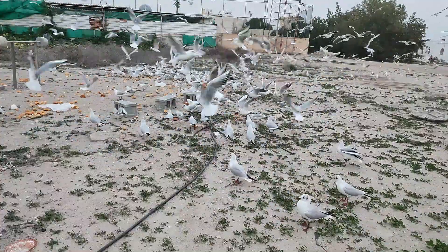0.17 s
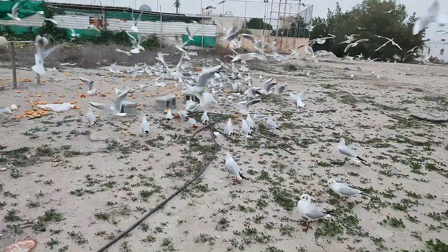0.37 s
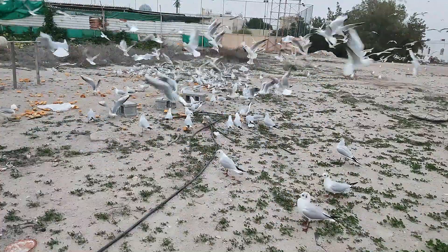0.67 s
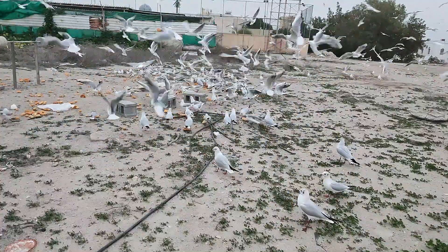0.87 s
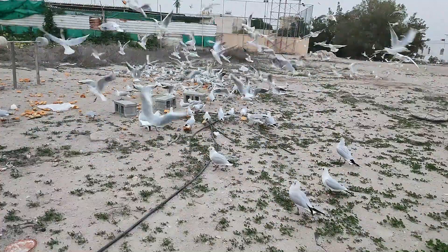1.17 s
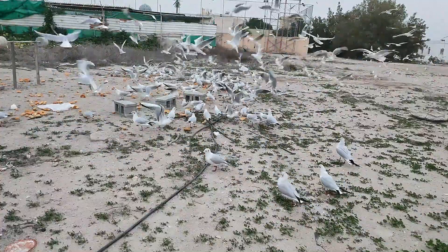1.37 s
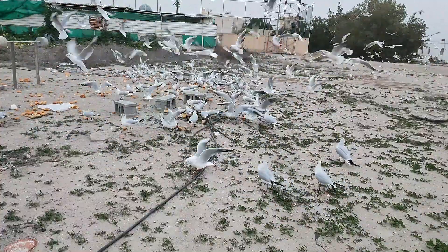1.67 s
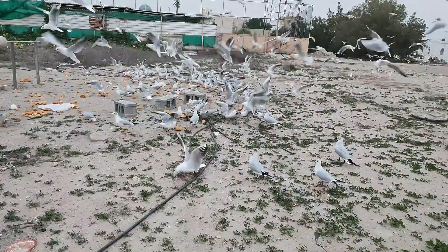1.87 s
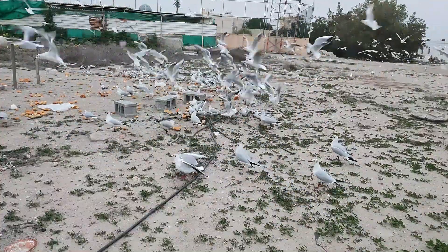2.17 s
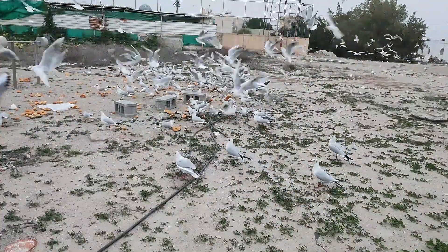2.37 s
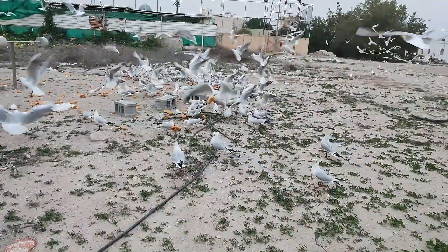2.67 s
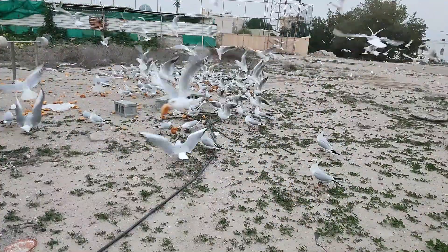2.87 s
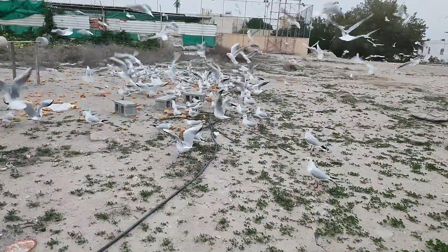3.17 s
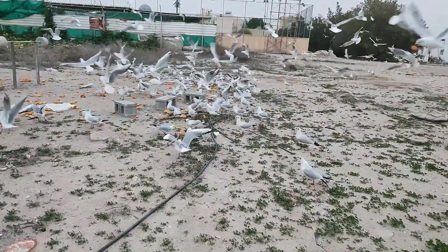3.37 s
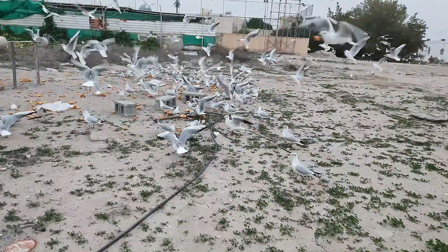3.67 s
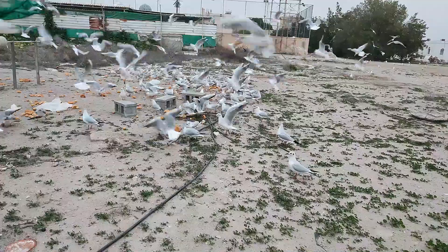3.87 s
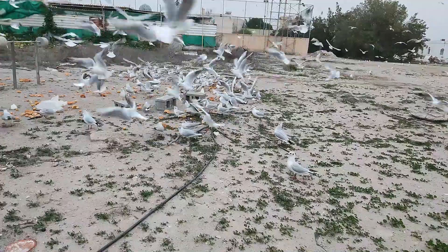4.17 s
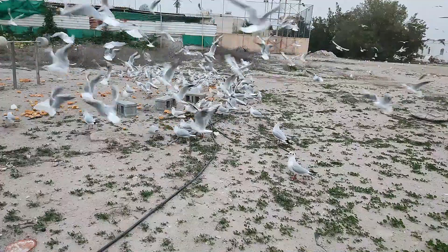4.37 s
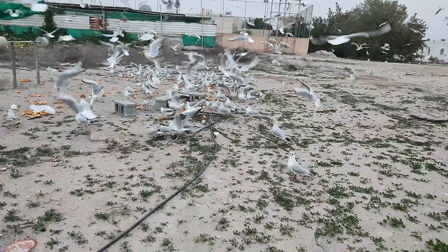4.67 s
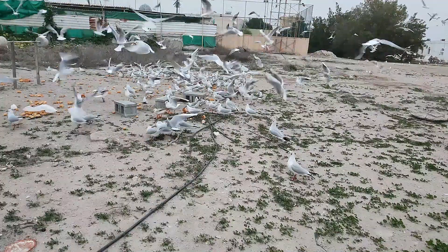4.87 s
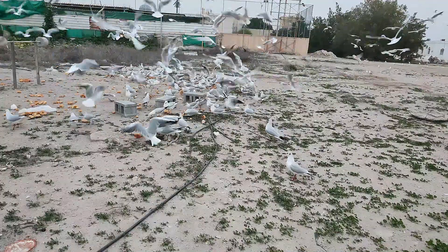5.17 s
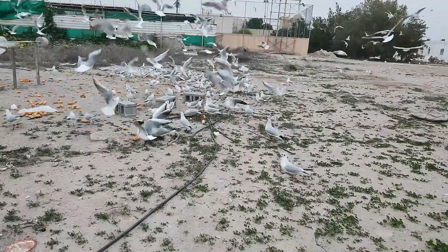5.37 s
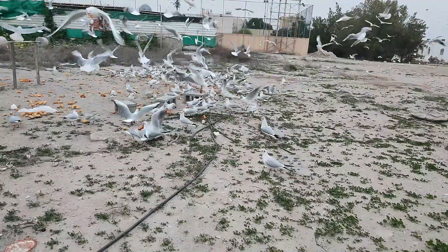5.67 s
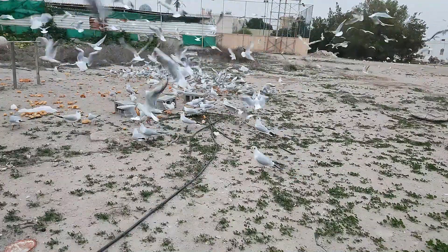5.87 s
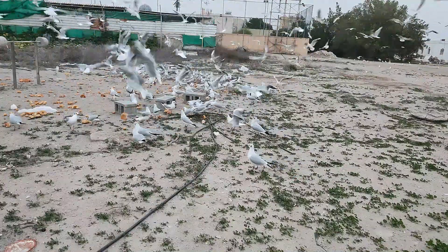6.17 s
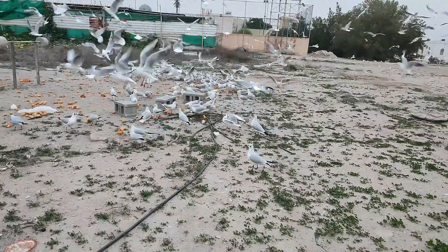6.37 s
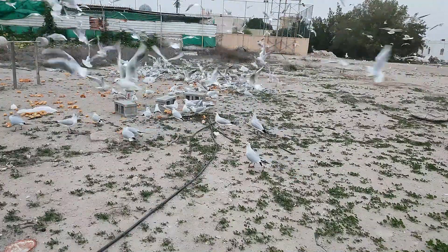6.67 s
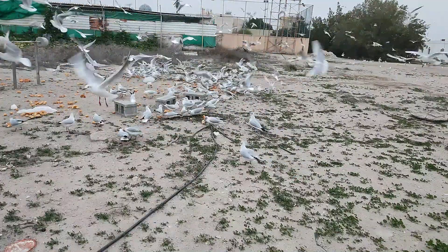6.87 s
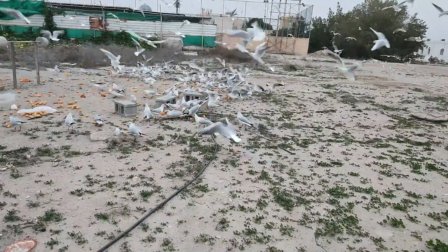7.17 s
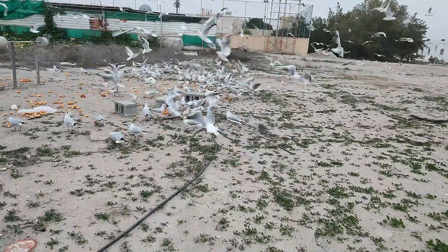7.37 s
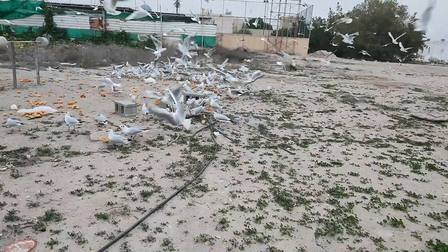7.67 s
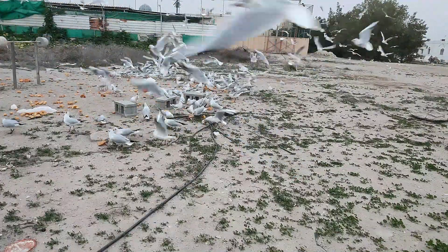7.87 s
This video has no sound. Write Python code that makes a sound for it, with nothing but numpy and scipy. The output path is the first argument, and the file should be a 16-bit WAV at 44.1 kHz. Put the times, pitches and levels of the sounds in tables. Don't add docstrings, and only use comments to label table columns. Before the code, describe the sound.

A dense flock of gulls screams and squabbles over food outdoors, raspy overlapping squeals, barks and croaks, with wing flaps and faint traffic behind.

```python
import sys
import numpy as np
from scipy import signal
from scipy.fft import rfft, irfft, next_fast_len
from scipy.io import wavfile
from scipy.ndimage import uniform_filter1d, map_coordinates

SR = 44100
rng = np.random.default_rng(int(sys.argv[2]) if len(sys.argv) > 2 else 0)


def to_wav(sig):
    pcm = np.clip(np.atleast_2d(sig), -1, 1) * 32767
    pcm = np.round(pcm).astype(np.int16)
    wavfile.write(sys.argv[1], SR, pcm.T)


def boost_factor(decibels):
    exponent = np.asarray(decibels, float) / 20
    return 10 ** exponent


N = 354123
SIDE_SHARE = .45


def rms_one(x):
    return x / np.sqrt(np.mean(x ** 2) + 1e-20)


def in_time(rows):
    s, *columns = np.transpose(rows)
    return [np.interp(np.arange(N) / SR, s, c) for c in columns]


def at_hz(points, hz):
    points = np.array(points)
    return np.interp(np.log(hz), np.log(points[:, 0]), points[:, 1])


def course(points, u):
    places = np.linspace(0, 1, len(points))
    return np.polyval(np.polyfit(places, points, len(points) - 1), u)


def drift(rate_hz, size=N):
    knots = rng.standard_normal(int(size / SR * rate_hz * 2) + 3)
    return map_coordinates(knots, [np.arange(size) * rate_hz * 2 / SR], order=1) * 1.274


def coloured(spectrum):
    size = next_fast_len(N)
    hz = np.maximum(np.arange(size // 2 + 1) * SR / size, 1)
    shaped = rfft(rng.standard_normal(size)) * boost_factor(at_hz(spectrum, hz))
    return rms_one(irfft(shaped, size)[:N])


# frequency in Hz, level in dB.
UPPER_FALL = [(4000, 20.5), (5000, 4), (7000, 0), (9000, -11), (12000, -42), (15000, -48)]


def cry(length, pitches_hz, voice_db, rasp, edge_s, chance, flutter,
        rate=None, darken_db=0, top=UPPER_FALL, breath_db=-11.0, sag=0):
    size = int(length * SR)
    u = np.arange(size) / size
    slow, fast, breath = flutter[:, int(chance[0] * (N - SR)):][:, :size]
    puffs_per_s = course(rate, u) if rate else (66 + 24 * chance[1]) * (1 + .07 * slow)
    puff = (.15 + np.cumsum(puffs_per_s) / SR) % 1
    arch = np.sin(np.pi * puff)
    bend = 1 + .05 * rasp * (arch - .7) - sag * (1 - arch) ** 4 + (.004 + .022 * rasp) * fast
    phase = 2 * np.pi * np.cumsum(course(pitches_hz, u) * bend) / SR
    order = np.arange(1, 12)[:, None]
    upper = order[4:, 0]
    first_db, second_db, fourth_db, top_db = voice_db
    upper_db = top_db + at_hz(top, upper * pitches_hz[len(pitches_hz) // 2])
    upper_db = upper_db + 1.5 * np.sin(40 * chance[2] * upper)
    gains = boost_factor(np.r_[first_db, second_db, 0, fourth_db, upper_db])
    tone = np.sin(order * phase + order ** 2)
    if darken_db:
        fade = -(2 * u - 1) ** 4 * np.where(order < 5, 1, .4)
        tone = tone * boost_factor(darken_db * np.where(order < 3, (2 * u - 1) ** 3, fade))
    tone = gains @ tone
    tone = tone + boost_factor(breath_db) * rasp * np.linalg.norm(gains) * breath
    gate = 1 - .92 * (1 - np.clip(arch / (.2 + .8 * rasp), 0, 1) ** 2.2)
    swell = np.clip(np.minimum(u, (1 - u) * 0.43) * length / edge_s, 0, 1)
    return np.sqrt(2) * tone * gate * swell * boost_factor((.5 if rate else 1.88) * slow)


def add(mix, sound, start, side):
    at = max(int(start * SR), 0)
    sound = sound[:N - at]
    mix[:, at:at + len(sound)] += sound * [[1], [side]]


# time in seconds, level in dB.
CROWD_EFFORT = [(0, -26.5), (.2, -25), (.4, -29), (.71, -24.5), (1.3, -27), (1.87, -23.5), (2.4, -26),
                (2.9, -29), (3.5, -27), (3.8, -29.5), (4.11, -22.5), (4.65, -24), (5.03, -26.5),
                (5.7, -30.5), (6.3, -28), (7.0, -25.5), (7.76, -23.5), (8.03, -40.5)]
# time in seconds, depth in dB, half length in seconds.
LULLS = [(0.135, 9.5, 0.049), (0.276, 4, 0.077), (0.462, 3, .1), (0.642, 11.5, 0.075), (1.588, 3.5, 0.12),
         (1.995, 8.5, .1), (2.195, 11.5, 0.083), (2.555, 8, 0.092), (3.264, 7, 0.13), (3.776, 9, 0.063),
         (4.0, 8, .09), (4.308, 12, 0.1), (4.54, 8.5, 0.068), (4.775, 6, .07), (4.935, 6, 0.071),
         (5.447, 22, 0.097), (5.896, 16, .1), (6.035, 7, 0.076), (6.205, 12, 0.12), (6.418, 10, 0.093),
         (6.589, 8.5, 0.073), (6.728, 13, 0.1), (6.916, 7.5, 0.098), (7.185, 12.5, 0.12), (7.429, 15, 0.12),
         (7.619, 13.5, 0.097)]
# time in seconds, depth in dB.
SHORT_GAPS = [(.81, 9.5), (.89, 2.5), (1.15, 4), (1.44, 3.5), (2.3, 2.5), (2.91, 5.5), (3.08, 10),
              (4.18, 7), (4.44, 8.5), (4.69, 7), (1.66, 4), (2.7, 4), (2.82, 5), (2.87, 4), (2.975, 4),
              (3.53, 5), (5.63, 4), (6.3, 5.5), (6.46, 4), (7.05, 15), (7.72, 5), (7.81, 14), (7.87, 6.5)]


def crowd_level():
    t = np.arange(N) / SR
    level_db = in_time(CROWD_EFFORT)[0]
    for s, depth_db, half_s in LULLS + [(*gap, .042) for gap in SHORT_GAPS]:
        level_db = level_db - depth_db * np.clip(1 - abs(t - s) / half_s, 0, 1)
    return level_db


# frequency in Hz, level in dB.
THROAT = [(300, -41), (700, -15.5), (1300, -6), (1600, 0), (1900, 1), (2600, -4), (3500, 3), (4200, -4.5),
          (5200, -15.5), (7000, -30.5), (9000, -34), (12000, -46.5), (15000, -64)]


def crowd(flutter, level_db, count=460):
    mix = np.zeros((2, N))
    for at, long, high, bend, loud, *chance in rng.random((count, 9)):
        pitch_hz = 780 + 620 * high
        glide = pitch_hz * (1 + np.array([0.1944 * (bend - .55), .03, -.2 * (bend - .35)]))
        shape_db = at_hz(THROAT, pitch_hz * np.arange(1, 5))
        shape_db = shape_db + np.array([4.9, 19, 20.5, 17]) * (np.array(chance) - .5)
        upper_db = -25.0 - shape_db[2] + 12 * (bend - .5)
        voice_db = [*(shape_db[[0, 1, 3]] - shape_db[2]), upper_db]
        sound = cry(0.0293 + .05 * long, glide, voice_db, 1.0, 0.0069, chance, flutter)
        side = SIDE_SHARE * np.sign(chance[3] - .5)
        add(mix, boost_factor(5.3 * loud + shape_db[2]) * sound, at * N / SR - .04, side)
    mix = mix / np.sqrt(uniform_filter1d(mix[0] ** 2, 1800) + 1e-6)
    hoarse = np.array([coloured(THROAT), SIDE_SHARE * coloured(THROAT)]) * boost_factor(-5 + 2.5 * drift(60))
    return boost_factor(level_db) * (mix + hoarse)


# frequency in Hz, level in dB per Hz.
DRONE = [(35, -23), (60, -15), (120, -11), (330, -16), (600, -9.5), (1100, -12.5), (2500, -16),
         (6000, -32.5), (14000, -61)]


def traffic(crowd_db):
    level_db = -36
    mid = boost_factor(level_db + .2 * (crowd_db + 30) + drift(4)) * coloured(DRONE)
    side = 0.22 * boost_factor(level_db) * coloured(DRONE)
    return np.array([mid, side])


# time in seconds, level in dB.
WIND = [
    (0.0, -32),
    (1.45, -31),
    (2.61, -19.5),
    (2.97, -29.5),
    (3.53, -22.5),
    (6.84, -54),
    (8.03, -41),
]


def wind():
    gusts = coloured([(1, -16), (4, 7.5), (12, -1.0), (25, -9.5), (50, -19), (200, -40), (2000, -82)])
    return boost_factor(in_time(WIND)[0] + 2.0 * drift(3.145)) * gusts


# time in seconds, firing rate in Hz, level in dB.
ENGINE_EARLY = [
    (0.0, 58.1, -48),
    (2.0, 68, -40),
    (2.6, 77, -41),
    (3.86, 89.7, -46),
    (5.7, 67.5, -62),
]
ENGINE_LATE = [
    (5.5, 56.6, -51.5),
    (6.3, 56, -45),
    (7.2, 55, -40),
    (7.63, 54.94, -38),
    (8.03, 57, -34),
]
ENGINE_FAINT = [
    (6.2, 60.8, -54),
    (7.87, 70.2, -51),
    (8.03, 71, -69),
]


def engine(rows):
    firing_hz, level_db = in_time(rows)
    t = np.arange(N) / SR
    fade = np.clip(np.minimum(t - rows[0][0] + 0.11, rows[-1][0] + 0.12 - t) / 0.13, 0, 1)
    phase = 2 * np.pi * np.cumsum(firing_hz * (1 + 0.00996 * drift(4))) / SR
    tone = np.sin(phase) + boost_factor(-12.0) * np.sin(2 * phase)
    return np.sqrt(2) * fade * boost_factor(level_db + 0.83 * drift(2.5)) * tone


# time in seconds, level in dB.
LORRY = [
    (0, -61),
    (3, -57.5),
    (4.7, -50.5),
    (5.8, -50.5),
    (6.8, -59),
    (8.03, -52.5),
]


def lorry():
    rumble = coloured([(20, -70), (90, -20), (150, 2.5), (260, 3.5), (420, -29), (15000, -120)])
    return boost_factor(in_time(LORRY)[0]) * rumble


def near_gulls(flutter, cries, edge_s=0.0085):
    mix = np.zeros((2, N))
    for row, chance in zip(cries, rng.random((len(cries), 4))):
        start, length, pitches_hz, level_db, voice_db, rasp, *manner = row
        voice_db = voice_db + 1.5 * (2 * chance - 1)
        sound = cry(length + 0.0128, pitches_hz, voice_db, rasp, edge_s, chance, flutter, *manner)
        side = SIDE_SHARE * np.sign(chance[3] - .5) * (.5 + chance[2])
        add(mix, boost_factor(level_db + 3.0) * sound, start - .006, side)
    return mix


def raspy(table, glide, voice_db):
    return [(s, long, hz * np.insert(glide, 1, 1), db, (*voice_db, upper_db), .8)
            for s, long, hz, db, upper_db in table]


# start in seconds, length in seconds, pitch in Hz, third harmonic in dB,
# upper harmonics in dB to the third.
BARKS = [(.035, .073, 1100, -34, -26), (.29, 0.049, 1070, -25, -48), (.51, .042, 970, -19, -48),
         (.836, 0.059, 1016, -25, -30), (.953, .036, 965, -22.5, -39), (1.374, 0.054, 1013, -23.5, -33),
         (1.859, 0.052, 1020, -23.5, -33), (2.248, .036, 1124, -27.5, -30), (5.546, 0.056, 1130, -31, -50),
         (6.021, 0.033, 1070, -32, -54), (6.334, .034, 971, -25.5, -26), (6.498, 0.082, 1137, -30.5, -45),
         (7.089, 0.037, 1120, -31, -39), (.235, .035, 1210, -29, -35)]


def barks():
    return raspy(BARKS, (1.025, 0.94), (-23.5, -13.5, -16.5))


# time in seconds, peak in dB.
WING_BEATS = [(0.039, -30), (0.295, -27), (0.721, -29), (1.086, -31), (1.343, -31), (1.531, -31),
              (1.816, -30), (2.259, -29), (2.434, -32), (2.641, -29), (3.1, -28), (3.332, -30),
              (3.607, -24), (3.788, -30), (4.116, -29), (4.475, -27), (4.878, -27), (5.203, -29),
              (5.481, -32), (5.749, -28), (5.947, -29), (6.125, -33.5), (6.432, -33), (6.781, -30),
              (7.092, -34), (7.455, -31)]
# frequency in Hz, level in dB.
WING_AIR = [(20, -60), (80, -18), (200, -1.5), (600, 4), (1000, -1), (2000, -25.5), (15000, -90)]


def wings():
    t = np.arange(N) / SR
    rise_s, fall_s = .015, .05
    beats = np.zeros(N)
    for s, db in WING_BEATS:
        beats += boost_factor(db - 8) * np.interp(t - s, [-rise_s, rise_s, 3 * fall_s], [0, 1, 0]) ** 2
    return beats * coloured(WING_AIR)


# start in seconds, length in seconds, pitch in Hz, third harmonic in dB,
# upper harmonics in dB to the third.
MEWS = [(.162, 0.097, 913, -28.5, -42), (.345, 0.075, 918, -27, -33), (.545, 0.094, 1208, -30, -24.5),
        (.98, 0.039, 1250, -31.5, -20), (1.031, 0.0785, 1057, -24, -46), (1.152, .042, 1233, -31, -15),
        (1.199, .048, 1260, -27.5, -19), (1.339, .069, 1190, -29.5, -21), (1.581, .043, 965, -31, -19),
        (1.874, 0.049, 1170, -27.5, -23), (2.5, .05, 1003, -30, -22.5), (3.609, 0.094, 1124, -30, -46),
        (7.885, .03, 930, -36, -40), (4.422, .046, 1000, -33, -31), (4.703, 0.058, 1110, -23, -24.5),
        (4.801, 0.047, 1116, -28.5, -25), (7.55, .03, 900, -37, -40), (7.523, 0.04, 1050, -37, -32),
        (2.99, .055, 1185, -33.5, -13), (2.83, .035, 1146, -38, -20), (7.465, 0.033, 1207, -42, -12),
        (7.838, 0.011, 1000, -32, -17.5), (.2, 0.051, 1177, -34.5, -30)]


def mews():
    return raspy(MEWS, (1.025, 0.96), (-24, -3, -10))


# start in seconds, length in seconds, level in dB, treble hiss in dB.
CROAKS = [(.165, .06, -30, -70), (0.672, .05, -31, -70), (.84, .05, -31.5, -66), (1.027, 0.063, -33, -68),
          (3.1, .055, -34, -56), (3.9, .04, -34, -64), (4.075, .06, -31, -62), (2.31, .04, -31, -68),
          (2.37, .06, -32, -64), (2.6, .03, -33, -70), (2.825, .045, -33, -64), (3.29, .07, -38, -59),
          (3.38, .12, -38, -62), (3.63, .08, -33, -64), (4.565, .055, -31, -64), (4.7, .04, -34, -61),
          (4.97, .19, -40, -59), (5.62, .12, -42, -62), (.35, .05, -33, -72), (7.67, .02, -36, -68),
          (5.006, 0.055, -33, -68), (5.545, .06, -31, -70), (6.1, .04, -35, -63), (6.24, .03, -47, -62),
          (6.315, .05, -35, -61), (7.085, 0.032, -34, -70), (7.275, .06, -33.5, -70),
          (7.444, .004, -36, -54), (7.506, .07, -32, -69), (7.74, .045, -28.5, -63)]
# frequency in Hz, level in dB per Hz.
BEAK_HISS = [(5000, -22), (6200, -5), (7500, 0), (8800, -1), (11000, -13), (13500, -27)]


def croaks():
    t, body, hiss = np.arange(N) / SR, np.zeros(N), np.zeros(N)
    for start, length, level_db, hiss_db in CROAKS:
        inside_s = np.minimum(t - start, start + length - t)
        swell = np.clip(inside_s / min(0.013, length) + .5, 0, 1)
        body += boost_factor(level_db) * swell
        hiss += boost_factor(hiss_db) * swell
    grain = boost_factor(4.0 * drift(90))
    mid = body * coloured(THROAT) + hiss * coloured(BEAK_HISS)
    side = SIDE_SHARE * hiss * coloured(BEAK_HISS)
    return grain * np.array([mid, side])


# start in seconds, length in seconds, pitch in Hz, third harmonic in dB,
# upper harmonics in dB to the third.
HOOTS = [(1.255, 0.1, 1045, -32, -36), (1.263, 0.12, 1085, -29.5, -26), (3.104, 0.067, 1177, -37.5, -20),
         (3.3, 0.07, 1270, -41, -30), (4.05, 0.077, 1085, -36, -25), (4.955, 0.055, 1190, -40, -40),
         (4.995, 0.04, 1270, -34, -32), (5.02, 0.065, 1338, -31.5, -27), (7.747, 0.039, 1430, -34, -32),
         (7.755, 0.035, 895, -36, -24), (2.44, .08, 1000, -41.5, -30), (3.45, 0.182, 848, -47, -26),
         (6.6, 0.075, 881, -44.5, -30), (7.09, 0.077, 796, -46.5, -30), (7.36, 0.047, 990, -42, -30),
         (1.808, .038, 1026, -43, -12), (.2, 0.055, 900, -40, -28), (.74, 0.052, 897, -36.5, -30)]


def hoots():
    return raspy(HOOTS, (0.99, 0.97), (-14, 7.3, -13))


# start in seconds, length in seconds, pitch in Hz, third harmonic in dB,
# upper harmonics in dB to the third.
RISING = [(.334, 0.075, 980, -34, -34), (0.662, 0.065, 1010, -24, -52), (.833, .03, 1250, -31, -30),
          (4.211, 0.04, 1102, -28.5, -20), (4.268, 0.038, 1030, -25, -32), (4.337, .029, 1238, -26, -21),
          (4.362, .083, 1061, -24.5, -30), (4.567, 0.0315, 1116, -21, -25), (4.849, .029, 1252, -29, -21),
          (4.96, 0.037, 1230, -31.5, -27), (7.285, 0.049, 1123, -30, -49), (7.255, .03, 930, -35, -40),
          (7.655, .028, 1030, -35, -35), (3.84, 0.03987, 1260, -38, -21)]


def rising_cries():
    return raspy(RISING, (0.93, 1.04), (-23, -8.5, -13))


# start in seconds, length in seconds, pitch in Hz, level in dB.
PEEPS = [
    (0.451, .054, 1590, -33.5),
    (4.87, 0.032, 1410, -31.5),
]
# start in seconds, length in seconds, then the pitch course in Hz.
LONG_PEEPS = [
    (4.965, .235, 1200, 1345, 1365, 1310, 1245),
    (5.2, .165, 1235, 1275, 1330, 1440),
]


def peeps():
    voice_db, rasp = (20, 0, -12, -22), .28
    short = [(s, long, hz * np.array([.93, 1, .94]), db - voice_db[0], voice_db, rasp)
             for s, long, hz, db in PEEPS]
    return short + [(*peep[:2], peep[2:], -57, voice_db, rasp) for peep in LONG_PEEPS]


# start in seconds, length in seconds, pitch in Hz, third harmonic in dB,
# upper harmonics in dB to the third.
YELPS = [(.466, 0.047, 1246, -29, -25), (.477, 0.019, 1213, -23, -32), (.903, .064, 1242, -24.5, -28),
         (.921, 0.03, 1200, -24.5, -24), (1.474, 0.035, 1283, -22, -23), (1.504, 0.067, 1190, -25, -23),
         (1.696, 0.065, 1200, -26, -21), (1.278, 0.035, 1090, -25, -22), (1.753, .087, 1225, -30.5, -22),
         (1.934, 0.045, 1250, -19, -25), (2.052, 0.0566, 1154, -23, -23.5),
         (2.379, 0.0716, 1200, -21.5, -24.5), (2.67, 0.04, 1200, -32, -24)]
YAPS = [
    (2.212, 0.047, 1265, -22, -24),
    (2.622, 0.04, 1358, -22, -24.5),
    (2.742, .066, 1320, -25.5, -28),
    (2.928, 0.0355, 1210, -27, -37),
]


def yelps_and_yaps():
    voice_db = (-29, -13.5, -18)
    return raspy(YELPS, (1.025, 0.94), voice_db) + raspy(YAPS, (.97, .955), voice_db)


# frequency in Hz, level in dB.
HARSH_TOP = [(4000, 8), (5000, 3.5), (7500, -0.5), (8800, -16), (12000, -41), (15000, -50)]
# start in seconds, length in seconds, then the pitch course in Hz.
SCREECH = (3.201, .15, 1290, 1150, 1110, 1190)


def screech():
    return [(*SCREECH[:2], SCREECH[2:], -37.5, (-17, -5, -1, -8), .8, (75, 75), 3, HARSH_TOP)]


# start in seconds, length in seconds, pitch in Hz, pitch change in Hz,
# third harmonic in dB.
SQUEALS = [
    (3.375, 0.065, 1215, -18, -31.5),
    (4.595, 0.12, 1210, -12, -33.5),
    (4.96, .05, 1250, 70, -37),
    (7.005, .05, 960, -300, -46),
    (5.182, 0.134, 1280, 55, -34),
]


def squeals():
    return [(s, long, hz + change * np.array([-.5, 0, .5]), db, (-7.5, 4.5, -23, -20.5), .28)
            for s, long, hz, change, db in SQUEALS]


# start in seconds, length in seconds, third harmonic in dB,
# upper harmonics in dB to the third, course of puffs per second.
HARSH = [
    (3.944, .118, -25, -15, (92, 70, 80)),
    (5.5, .11, -33, -32, (85, 85)),
    (6.108, .024, -26.5, -21, (75, 75)),
    (4.0775, .055, -26, -25, (64, 64)),
    (7.6885, .012, -27, -36, (82, 82)),
    (7.9435, .013, -31.5, -42, (77, 77)),
    (7.752, .028, -31, -28, (90, 90)),
]
HARSH_PITCH = [
    (1020, 1150, 1205, 1120),
    (830, 1130, 1040),
    (1065, 1055, 1020),
    (1090, 1060, 960),
    (1020, 1040, 1000),
    (1050, 1065, 1040),
    (980, 960, 910),
]
HARSH_BREATH_DB = (-3, -9, -12, 0, -13, -16, -6)


def harsh_cries():
    return [(s, long, pitches_hz, db, (-20, -4, -4, upper_db), .8, rate, 2.0, HARSH_TOP, breath_db)
            for (s, long, db, upper_db, rate), pitches_hz, breath_db in zip(HARSH, HARSH_PITCH, HARSH_BREATH_DB)]


# start in seconds, length in seconds, then the pitch course in Hz.
WHISTLE = (5.59, .16, 1290, 1335, 1345)


def whistle():
    return [(*WHISTLE[:2], WHISTLE[2:], -34, (-1, -22, -22, -19.5), .28)]


# start in seconds, length in seconds, then the pitch course in Hz.
ARCH = (6.79, .265, 1030, 1297, 1327, 1225, 860)


def arching_cry():
    return [(*ARCH[:2], ARCH[2:], -28.5, (-20, -2.5, -23, -20.5), .27, (72, 72), 6.9, UPPER_FALL, -18, .07)]


def scene():
    flutter = np.array([drift(40), drift(250), coloured(THROAT)])
    crowd_db = crowd_level()
    cries = barks() + mews() + hoots() + rising_cries() + peeps() + yelps_and_yaps()
    cries += screech() + squeals() + whistle() + arching_cry()
    birds = crowd(flutter, crowd_db) + near_gulls(flutter, cries)
    birds = birds + near_gulls(flutter, harsh_cries(), edge_s=.004) + croaks()
    mid, side = birds + traffic(crowd_db)
    mid = mid + wind() + engine(ENGINE_EARLY) + engine(ENGINE_LATE) + engine(ENGINE_FAINT)
    mid = mid + lorry() + wings()
    side = signal.sosfilt(signal.butter(12, 5800, "high", fs=SR, output="sos"), side)
    return np.array([mid + side, mid - side])


def top_cut(x):
    return signal.sosfilt(signal.butter(12, 15600, fs=SR, output="sos"), x)


def record(dry):
    rounded = .85 * np.tanh(dry / .85)
    mix = signal.sosfilt(signal.cheby2(10, 9, 14400, fs=SR, output="sos"), rounded)
    return top_cut(mix)


dry = scene()
out = record(dry)
to_wav(out)
```